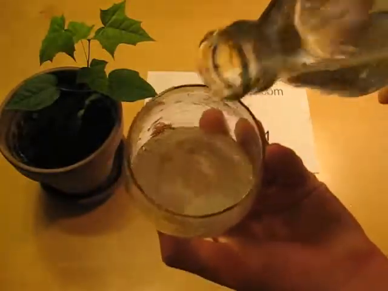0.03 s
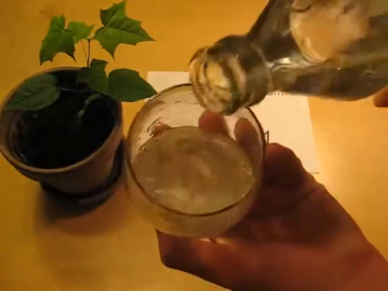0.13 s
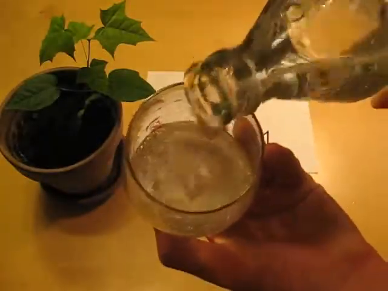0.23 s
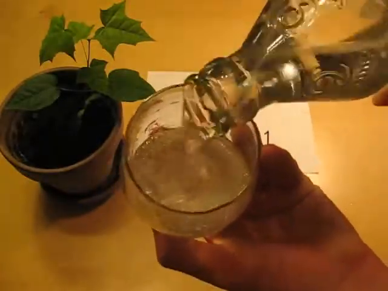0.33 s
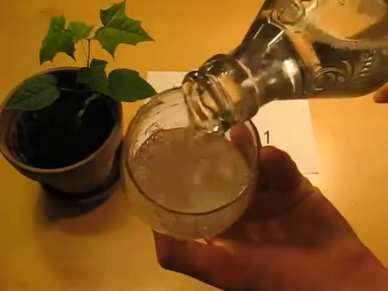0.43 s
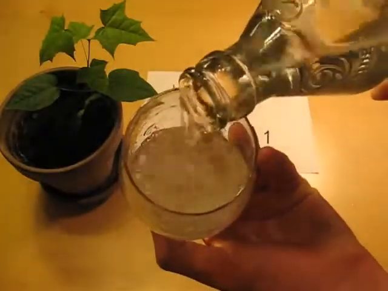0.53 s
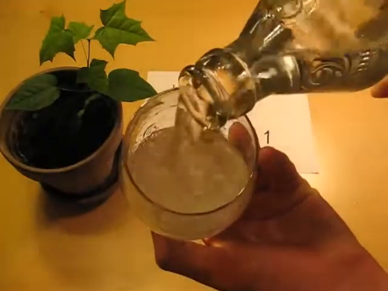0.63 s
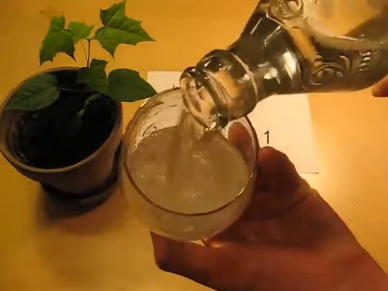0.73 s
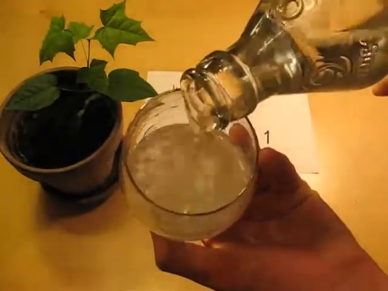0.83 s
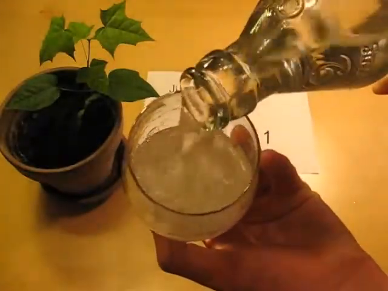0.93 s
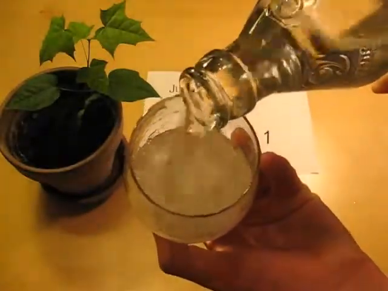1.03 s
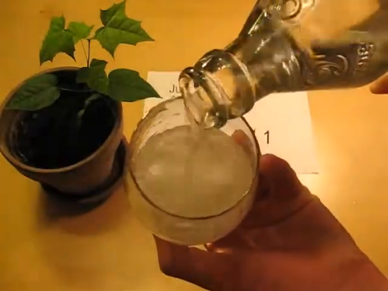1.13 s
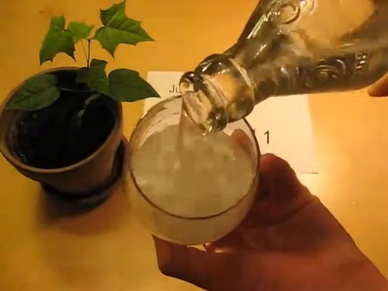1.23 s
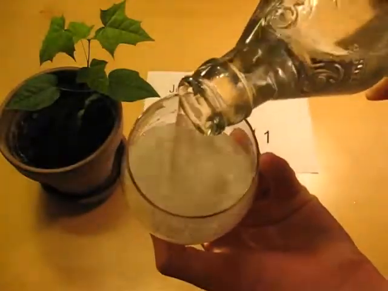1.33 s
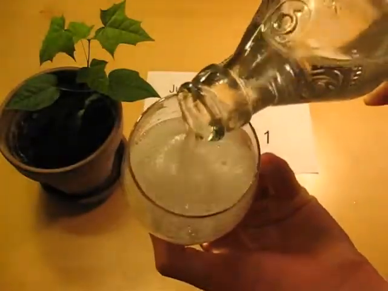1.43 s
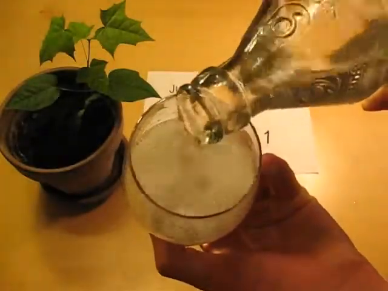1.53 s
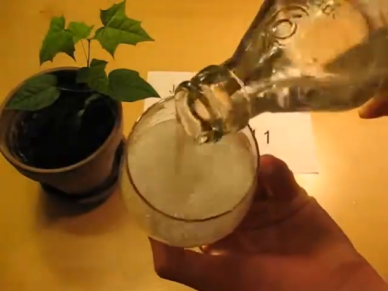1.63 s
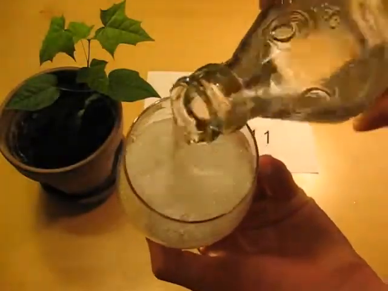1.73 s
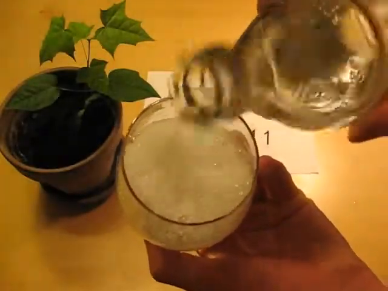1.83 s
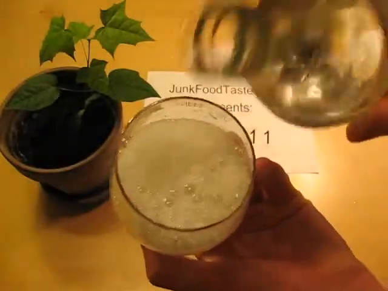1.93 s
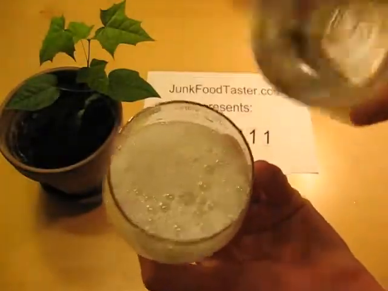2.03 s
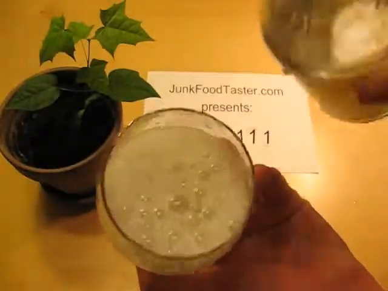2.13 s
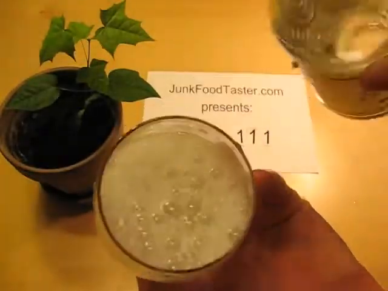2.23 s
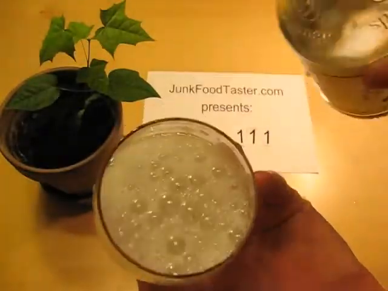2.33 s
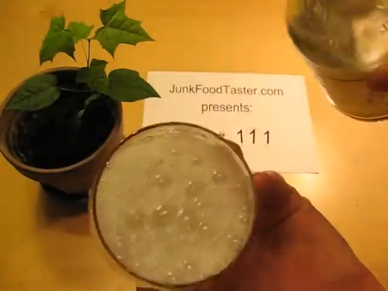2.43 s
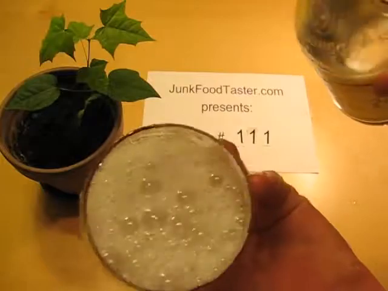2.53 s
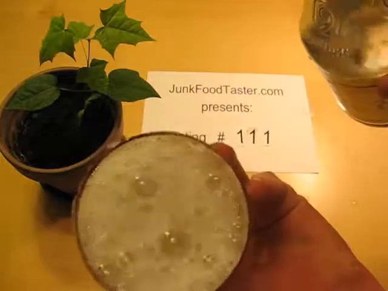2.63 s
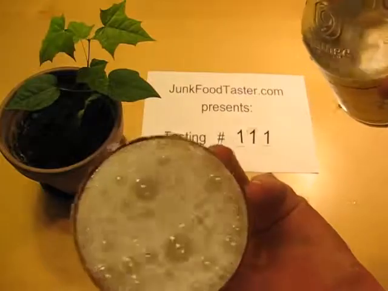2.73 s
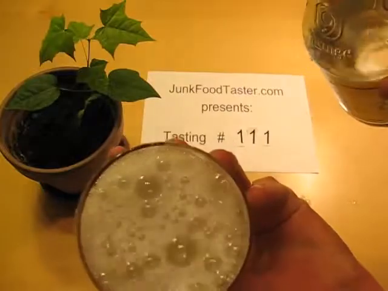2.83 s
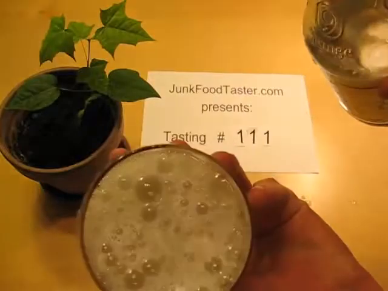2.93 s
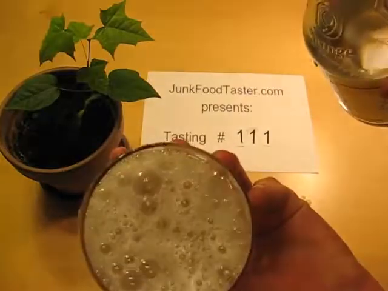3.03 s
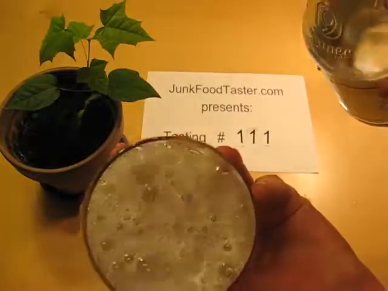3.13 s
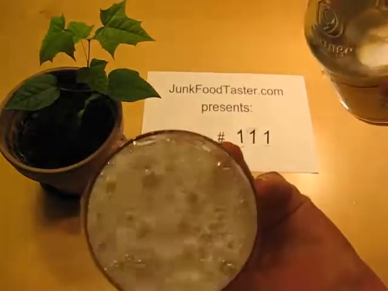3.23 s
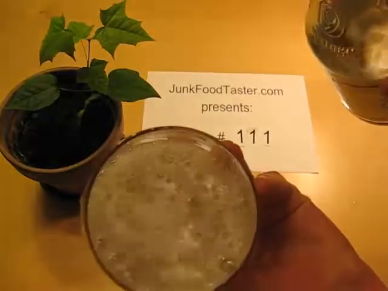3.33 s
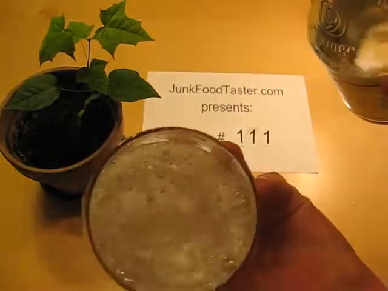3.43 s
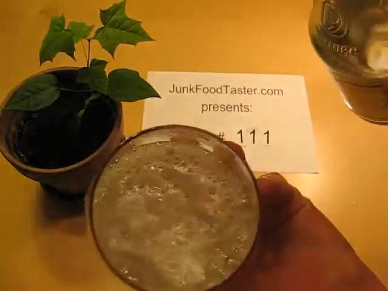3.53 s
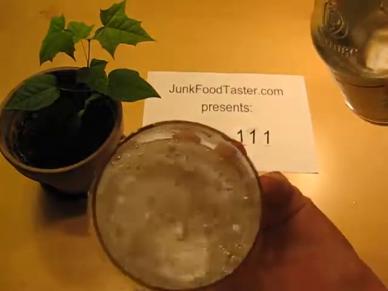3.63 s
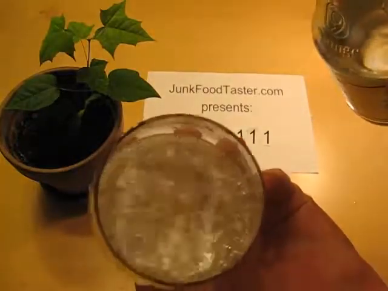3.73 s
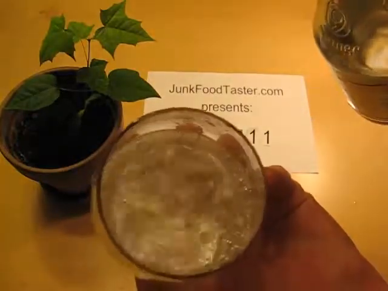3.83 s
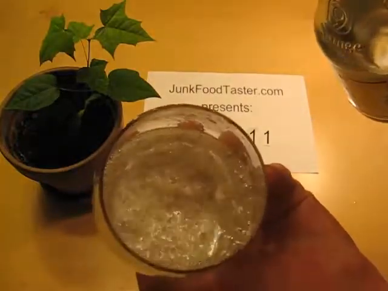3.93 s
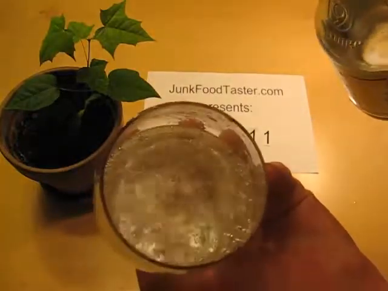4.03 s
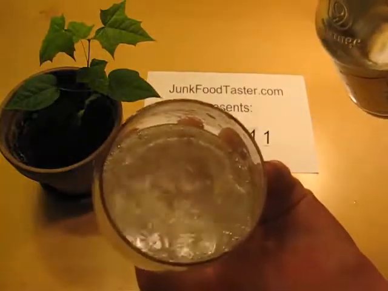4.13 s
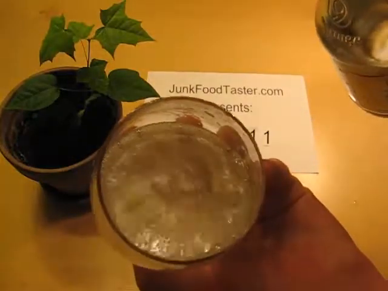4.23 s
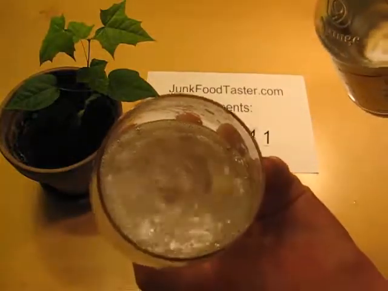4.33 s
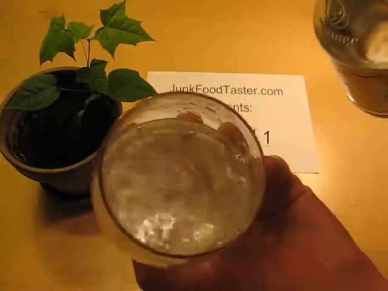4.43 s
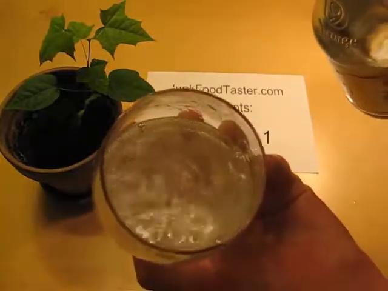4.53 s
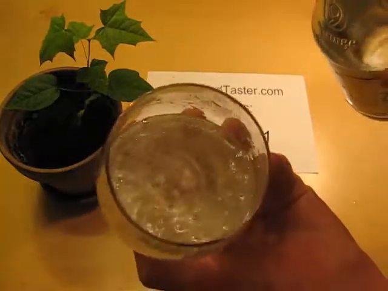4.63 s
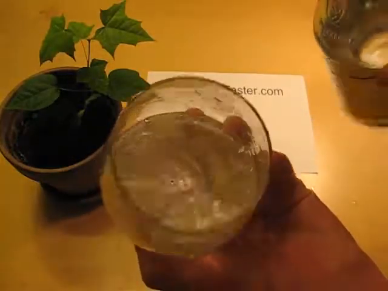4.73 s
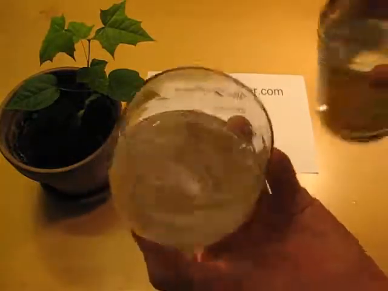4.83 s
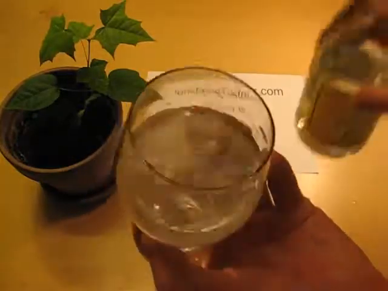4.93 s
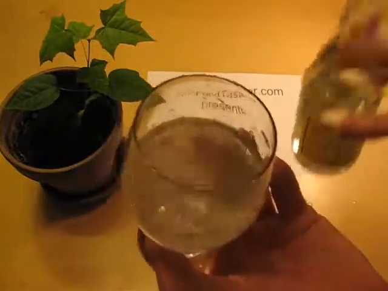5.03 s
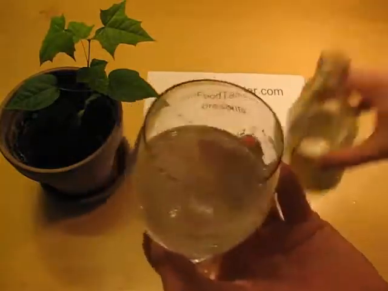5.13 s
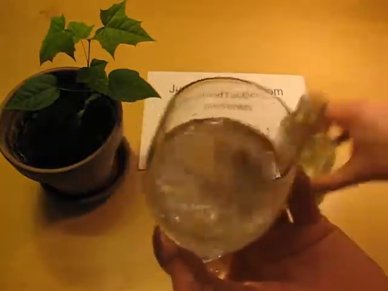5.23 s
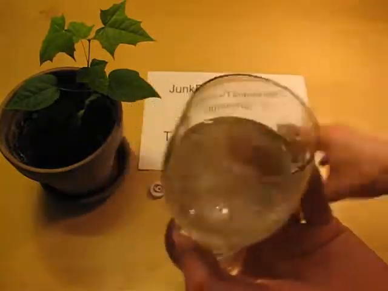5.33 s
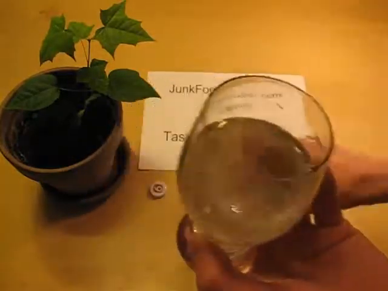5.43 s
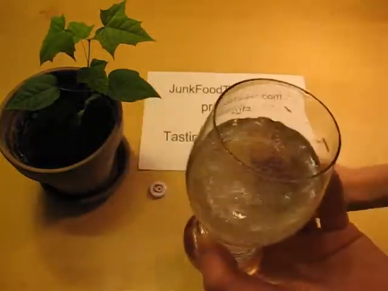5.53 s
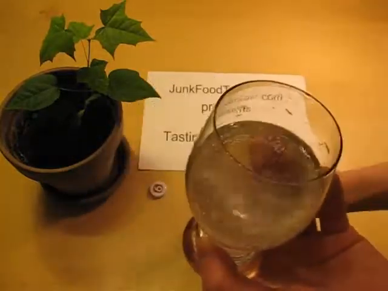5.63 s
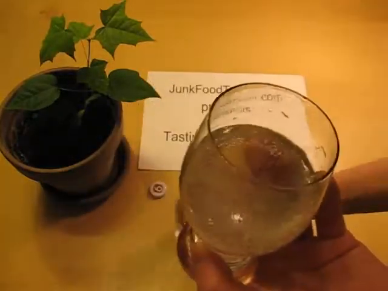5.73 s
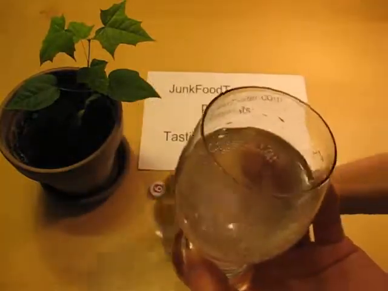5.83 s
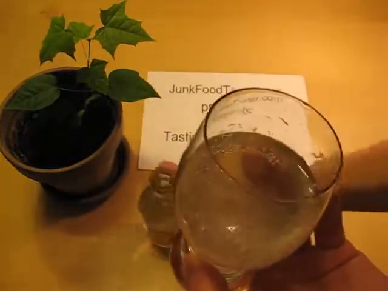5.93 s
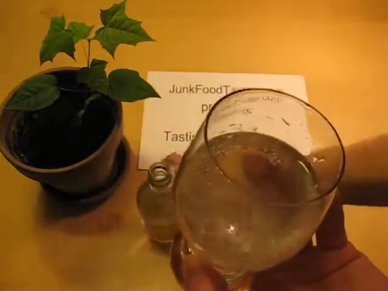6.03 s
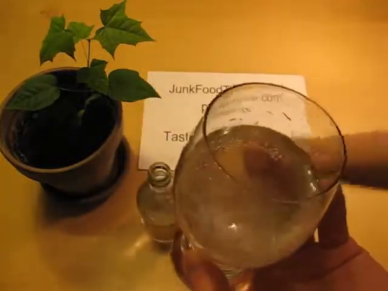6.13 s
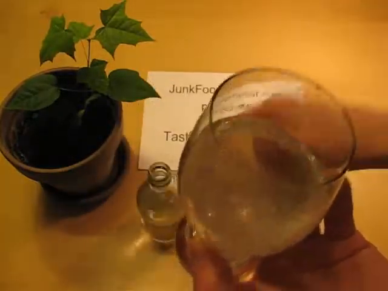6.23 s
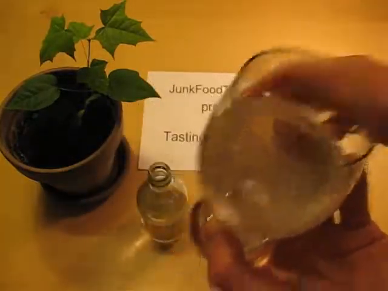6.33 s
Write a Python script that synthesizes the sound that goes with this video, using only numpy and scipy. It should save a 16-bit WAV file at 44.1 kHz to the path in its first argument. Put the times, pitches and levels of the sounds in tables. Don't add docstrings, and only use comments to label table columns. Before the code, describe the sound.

Close fizzy pour from bottle to glass: clink, snapping splashes, gulps, crackling foam fading to sparse pops, ending with a hard thud on a table.

```python
import sys
import numpy as np
from scipy import signal
from scipy.fft import rfft, irfft, next_fast_len
from scipy.io import wavfile

SR = 44100
rng = np.random.default_rng(int(sys.argv[2]) if len(sys.argv) > 2 else 0)


def materialize(psi):
    bounded = np.clip(np.atleast_2d(psi).T, -1, 1)
    quanta = np.round(bounded * 32767).astype(np.int16)
    wavfile.write(sys.argv[1], SR, quanta)


def amplitude_ratio(level_db):
    exponent = np.asarray(level_db, float) / 20
    return 10 ** exponent


N = 280917
SIZE = next_fast_len(N + 8192)
HZ, T = np.fft.rfftfreq(SIZE, 1 / SR), np.arange(N) / SR


def evened(x):
    return x / np.sqrt(np.mean(x ** 2) + 1e-20)


def follow(points, t=T):
    return np.interp(t, *np.transpose(points))


def read(points):
    f, value = np.transpose(points)
    return np.interp(np.log(HZ + 1), np.log(f + 1), value)


def colour(x, points):
    cepstrum = irfft(np.log(amplitude_ratio(np.maximum(read(points), -90))), SIZE)
    lag = np.arange(SIZE)
    fold = np.where(lag > SIZE // 2, 0, np.where(lag > 0, 2, 1))
    response = np.exp(rfft(cepstrum * fold))
    return evened(irfft(rfft(x, SIZE) * response, SIZE)[..., :N])


def tinted(x, points):
    return x.std() * colour(x, points)


def add(mix, s, sound):
    part = mix[round(s * SR):][:len(sound)]
    part += sound[:len(part)]


def resonate(x, hz, width):
    turn = np.exp(2j * np.pi * np.cumsum(hz * np.ones(N)) / SR)
    r = np.exp(-np.pi * width / SR)
    return 2 * (turn * signal.lfilter([1 - r], [1, -r], x / turn)).real


def ring(hz, db, t60, glide=0., rise=0.0011, turns=0.):
    t = np.arange(round(max(t60, .004) * SR)) / SR
    envelope = amplitude_ratio(db - 60 * t / t60) * (1 - np.exp(-t / rise))
    return envelope * np.sin(2 * np.pi * (turns + hz * t * (1 + glide * t / t60)))


def puff(db, fade):
    t = np.arange(600) / SR
    return amplitude_ratio(db) * rng.standard_normal(600) * np.exp(-t / fade)


def swell(top_hz, low_hz=1):
    rates = np.geomspace(low_hz, top_hz, 16)
    return evened(sum(np.sin(2 * np.pi * (f * T + rng.random())) / np.sqrt(f) for f in rates))


def summed(*db):
    return 10 * np.log10(sum(amplitude_ratio(d) ** 2 for d in db))


# (frequency [Hz], likeness [0-1])
NEAR_SAME = [(60, 1), (130, 1), (290, 0.91), (640, 0.92), (1410, 1), (3100, 0.92), (6820, 0.74),
             (15000, 0.01)]
# (frequency [Hz], left over right [dB])
NEAR_BALANCE = [(60, -1), (110, -1), (200, 0.5), (380, -2), (700, 0), (1290, 0.5), (2380, -2.5),
                (4400, -5.5), (8120, -2.5), (15000, 16)]
# (frequency [Hz], left lead [rad])
NEAR_LEAD = [(0, 0.13), (3700, 0.023), (4700, 0.64), (9000, 0.73), (16000, 3.3)]


def ports(pair, same, louder=NEAR_BALANCE, lead=NEAR_LEAD):
    a, b = rfft(pair, SIZE)
    likeness = np.clip(read(same), 0, 1)
    side = amplitude_ratio(read(louder) / 2) * np.exp(.5j * read(lead))
    shared, own = np.sqrt((1 + likeness) / 2) * a, np.sqrt((1 - likeness) / 2) * b
    return irfft(np.array([(shared + own) * side, (shared - own) / side]), SIZE)[:, :N]


# (frequency [Hz], t60 [s])
ROOM_DECAY = [(120, 1), (320, 0.6), (840, 0.57), (2200, 0.67), (4500, 0.69), (7000, 0.38), (12000, 0.093)]


def tail(t60_scale, start):
    taps = np.zeros((2, SR))
    at = np.arange(start, SR - 20, 20)
    at = at + rng.integers(0, 20, (2, len(at)))
    np.put_along_axis(taps, at, rng.choice([-1., 1.], at.shape), 1)
    hz, t, z = signal.stft(taps, SR, nperseg=256)
    t60 = t60_scale * follow(ROOM_DECAY, hz)
    taps = signal.istft(z * amplitude_ratio(-60 * t / t60[:, None]), SR, nperseg=256)[1]
    return taps / np.linalg.norm(taps[0])


# (frequency [Hz], level [dB per Hz])
HUSH_TONE = [(15, -51), (25, -15), (400, -5.5), (973, -9), (1210, -9.5), (1540, -14.5), (2570, -19.5),
             (3020, -6), (3450, -18), (4100, -9), (6300, -12.5), (7530, -2), (9090, -10.5), (12200, -13.5),
             (15600, -53)]
# (frequency [Hz], likeness [0-1])
HUSH_SAME = [(60, 0), (130, 0.54), (290, 0.5), (640, 0.76), (1410, 0), (3100, 0), (6820, 0.55),
             (15000, 0.9)]


def hush():
    noise = colour(rng.standard_normal((2, N)), HUSH_TONE)
    return ports(amplitude_ratio(-49 + 1.2 * swell(8.4)) * noise, HUSH_SAME)


def bubbles(per_s, spread_db, cycles, count=14, largest=6):
    size = amplitude_ratio(spread_db * np.minimum(rng.exponential(1, (2, N)), largest))
    size = size * (rng.random((2, N)) < per_s / SR)
    kind, z, power = rng.integers(0, count, (2, N)), 0, 1e-9
    for k, hz in enumerate(np.geomspace(600, 16000, count)):
        burst = ring(hz, 0, cycles / hz, glide=0.38, rise=0.34 / hz)
        grain = rfft(evened(burst) * np.sqrt(hz), SIZE)
        z = z + grain * rfft(size * (kind == k), SIZE)
        power = power + abs(grain) ** 2
    return evened(irfft(z / np.sqrt(power), SIZE)[:, :N])


# (time [s], level [dB])
BURSTING = [(0.0, -56.5), (0.17, -45.5), (0.35, -77), (0.6, -67), (0.89, -49), (1.17, -41.5), (1.33, -39.5),
            (1.89, -38), (2.3, -37), (3.05, -37), (3.26, -36.5), (3.56, -36), (4.15, -45), (4.65, -47.5),
            (5.13, -59.5), (5.5, -86)]
# (time [s], depth [0-1])
HEAD = [
    (1.15, 0.32),
    (1.35, 0.85),
    (2.2, 0.97),
    (2.75, 0.93),
    (3.2, 0.61),
    (3.6, 0),
]
# (time [s], level [dB])
SLOSH = [
    (.3, -60),
    (.5, -63),
    (4.8, -58),
    (5.15, -61.5),
    (5.45, -57.5),
    (5.74, -52.5),
    (5.95, -46),
    (6.15, -53),
]


def controls():
    foam_db, head = follow(BURSTING), np.clip(follow(HEAD), 0, 1)
    filled = np.clip((T - 0.27) / (1.9 - 0.27), 0, 1)
    deep_bare_db, deep_full_db = -22, -4
    cross_bare_db, cross_full_db, cross_rest_db = -9.5, -27, -16
    deep_db = summed(foam_db + deep_bare_db + (deep_full_db - deep_bare_db) * head, follow(SLOSH))
    thin_db = -43 - 3 * np.sin(np.pi * filled) ** .5
    thin_db = thin_db - 3.5 * np.maximum(T - 3.5, 0)
    cross_db = foam_db + cross_bare_db + (cross_full_db - cross_bare_db) * head
    cross_db = summed(cross_db, thin_db + cross_rest_db)
    empty_hz, full_hz = 990, 1221
    return foam_db, deep_db, thin_db, cross_db, empty_hz + (full_hz - empty_hz) * filled


# (frequency [Hz], level [dB per Hz])
FOAM_TONE = [(880, -72), (1500, -24), (2240, -17), (2810, -3), (3250, -6.5), (4320, -0.5), (5570, -2),
             (7190, 1), (9640, -11.5), (12000, -15), (14300, -22.5), (15600, -44)]
DEEP_TONE = [(260, -100), (450, -6), (553, -15.5), (640, -3), (917, -3.5), (1140, 4), (1990, -1),
             (3500, -18), (4550, -17), (7700, -120)]
THIN_TONE = [(880, -76), (1500, -21), (2600, -22), (2920, -23), (3450, 5.5), (4360, -6), (6150, 7),
             (7260, 9), (9930, -2), (15600, -15)]
# (frequency [Hz], width [Hz], level [dB])
AIR_MODES = [(2924, 164, -4.5), (4500, 71, -7), (5630, 200, -4), (7500, 340, 3.5), (8060, 320, 0),
             (11540, 1900, -1)]
# (time [s], stretch [ratio])
TILT = [
    (3.2, .985),
    (3.9, 1.0),
    (4.75, 1.0),
    (5.15, 1.025),
]
# (time [s], pitch stretch [ratio], ring share [ratio])
CUP_LOAD = [
    (1.7, 1.1, 0.59),
    (2.0, 1.03, 0.74),
    (2.3, 1.18, 0.22),
    (2.58, 0.97, 1.08),
    (3.1, 1, 1),
    (3.6, 1.03, 1.7),
    (4.4, 1.01, 0.65),
    (5.599, 1.01, 0.94),
    (6.0, 1.1, 0.2),
]
# (time [s], frequency [Hz], share [ratio])
COLLAPSE = [
    (2.7, 4300, -0.013),
    (2.97, 4400, .5),
    (3.25, 6340, 0.35),
    (3.5, 5230, -0.25),
    (3.9, 5300, 0.46),
]
# (time [s], level [dB])
STREAM = [
    (.4, -66),
    (.44, -64),
    (.8, -48.5),
    (1.1, -46.5),
    (1.7, -50),
    (1.95, -83),
]
# (frequency [Hz], level [dB per Hz])
DROPLET_TONE = [(900, -8), (1800, -23), (3200, -2.5), (4500, 0), (7500, -5), (12000, -35)]


def fizz():
    foam_db, deep_db, thin_db, cross_db, air_hz = controls()
    s, sag, share = np.transpose(CUP_LOAD)
    air_hz, rings = air_hz * np.interp(T, s, sag), np.interp(T, s, share)
    dense, sparse = bubbles(9000, 0.78, 8.2), bubbles(5000, 0.9, 16.7)

    foam = amplitude_ratio(foam_db + 2.0 + .5 * swell(21)) * colour(dense, FOAM_TONE)
    s, hz, share = np.transpose(COLLAPSE)
    foam = foam + np.interp(T, s, share) * resonate(foam, np.interp(T, s, hz), 1200)

    deep = colour(dense, DEEP_TONE)
    cup_colour = 1.15 * resonate(deep, air_hz, 125) - .5 * resonate(deep, 720, 410)
    deep = amplitude_ratio(deep_db - 1.0 + 0.067 * swell(19)) * (deep + rings * cup_colour)

    stretch = np.where(T < 2.55, 1, follow(TILT))
    modes = []
    for hz, width, db in AIR_MODES:
        once = resonate(sparse, hz * stretch, 1.07 * width)
        modes.append(amplitude_ratio(db) * evened(resonate(once, hz * stretch, 1.07 * width)))
    cross, *upper = modes
    cup = amplitude_ratio(-25.0) * rings * evened(resonate(sparse, air_hz, 48))
    thin = evened(sum(upper)) + cup + amplitude_ratio(4.5) * colour(sparse, THIN_TONE)
    thin = amplitude_ratio(thin_db - 3.5 + 0.11 * swell(30)) * thin
    drops = amplitude_ratio(follow(STREAM)) * colour(bubbles(900, 4.5, 11.0, count=9, largest=2.2), DROPLET_TONE)

    bare = np.clip((-50.0 - deep_db) / 9, 0, 1)
    hiss = (1 - 0.019 * bare) * foam + 0.3 * bare * amplitude_ratio(foam_db) * evened(sum(upper[:2])) + thin
    hiss = hiss - 1.0 * bare * resonate(hiss, 3300, 380)
    high_valleys = resonate(hiss, 6280, 520) + resonate(hiss, 5230, 340)
    hiss = hiss - 0.75 * bare * resonate(hiss, 3610, 750) - 0.5 * bare * high_valleys
    bowl = amplitude_ratio(cross_db + 5.5) * (0.44 + 0.33 * bare) * (cross + amplitude_ratio(9.0) * bare * cup)
    return hiss + deep + bowl + drops


def gulp(db, start_hz, end_hz, length, lean):
    u = np.arange(round(length * SR)) / (length * SR)
    turns = np.cumsum(start_hz * (end_hz / start_hz) ** u) / SR
    return amplitude_ratio(db) * np.sin(np.pi * u ** lean) ** 2 * np.sin(2 * np.pi * turns)


# (time [s], peak level [dB], length [s])
GULPS = [
    (0.499, -41, 0.067),
    (0.85, -45.5, 0.052),
    (1.147, -44.5, 0.061),
    (1.467, -41.5, 0.043),
]
# (time [s], peak level [dB], frequency [Hz], length [s])
GLUGS = [
    (.97, -51.5, 142, 0.052),
    (1.017, -42.5, 315, 0.043),
    (1.259, -45, 203.5, 0.067),
    (1.312, -36.5, 311, 0.041),
    (1.368, -49, 273, 0.11),
    (1.554, -38.5, 240, 0.055),
    (1.633, -39, 296, 0.033),
    (1.696, -38, 290, 0.014),
]
# (time [s], frequency [Hz], level [dB])
NECK = [
    (0.0, 251, -55),
    (.5, 252, -58.5),
    (1.25, 254, -62.5),
    (1.7, 262, -66.5),
    (2.47, 262, -67),
    (2.56, 262, -78),
    (2.88, 262, -76),
    (2.98, 262, -68),
    (3.75, 262, -69),
    (3.9, 262, -87),
]
# (time [s], level [dB])
HANDLING = [
    (4.4, -73),
    (4.7, -57),
    (4.9, -65),
    (5.2, -69),
    (5.5, -62.5),
    (5.75, -56),
    (5.85, -90),
]


def bottle():
    out = np.zeros(N)
    for s, db, length in GULPS:
        add(out, s, gulp(db, 25.8, 243, length, lean=2.0))
    for s, db, hz, length in GLUGS:
        add(out, s, gulp(db, hz, 0.964 * hz, length, lean=0.56))
    s, hz, db = np.transpose(NECK)
    hz = np.interp(T, s, hz)
    tone = 0.64 * np.sin(2 * np.pi * np.cumsum(hz) / SR)
    hum = evened(resonate(rng.standard_normal(N) + tone, hz, 24.0))
    rub = evened(resonate(rng.standard_normal(N), 310, 210))
    out += amplitude_ratio(follow(HANDLING) + 2.0 * swell(19)) * rub
    return out + amplitude_ratio(np.interp(T, s, db) - 15 * np.maximum(T - s[-1], 0)) * hum


# (frequency [Hz], level [dB per Hz])
SPRAY_TONE = [(880, -68), (1500, -18.5), (2920, -16.5), (5250, -4.5), (7400, -6), (10000, -14.5),
              (12500, -16.5), (15600, -39)]
RIM_HZ = [630, 624, 760, 1001, 1250, 1403, 2630, 3030, 4836, 6300, 7530, 7765, 9600]
# (level [dB], t60 [s], lean to the left [-1 to 1])
RIM = [(2.5, 0.036, -0.11), (-26, 0.18, -.3), (1.5, 0.018, 0.19), (2.5, 0.025, .1), (0, 0.026, .1),
       (-18.5, 0.51, -.2), (-21, 0.3, -.2), (4.5, .014, -0.23), (-8, 0.62, 0.96), (-2, .024, .1),
       (-19, 0.49, -0.1), (-18, .11, .1), (-30, 0.12, .1)]
TWIN_HZ = [1392, 4845, 7552]
# (level [dB], t60 [s], start [turns])
TWINS = [(-14.5, 0.17, 0.067), (-7, .34, 0.41), (-13.5, 0.21, 0.81)]


def clink():
    hit_s, hit_db = .3058, -16
    out, tick, facing = np.zeros((3, N))
    for hz, (db, t60, lean) in zip(RIM_HZ, RIM):
        add(out, hit_s, -ring(hz, hit_db + db + 3.5, t60, rise=0.0009))
        add(facing, hit_s, -lean * ring(hz, hit_db + db + 3.0, t60, rise=.0005))
    for hz, (db, t60, start) in zip(TWIN_HZ, TWINS):
        add(out, hit_s, -ring(hz, hit_db + db + 6.5, t60, turns=start))
    add(tick, hit_s, puff(hit_db + 1.5, 0.0031))
    tick = tinted(tick, SPRAY_TONE)
    thin_glass = signal.butter(2, 380, "highpass", fs=SR)
    return signal.lfilter(*thin_glass, [out + tick, 0.73 * tick + facing])


# (time [s], peak level [dB], ring [Hz], low thump [dB relative])
PLOPS = [(0.432, -28, 990, -31), (0.471, -19, 990, -11), (0.532, -35, 806, -14), (0.548, -40, 960, 1),
         (0.574, -36, 925, -19), (0.584, -33, 810, -8), (0.61, -41, 980, -14), (0.658, -25, 811, -17),
         (0.6596, -26.5, 1080, -24), (0.692, -39.5, 820, -9), (0.708, -37.5, 1010, -16),
         (0.739, -37, 940, -13), (0.79, -38.5, 1230, -6), (0.84, -45, 700, -14), (0.916, -40, 1130, -2),
         (0.964, -44, 1100, -14), (1.05, -42, 1110, -20), (1.094, -37, 1270, -10),
         (1.439, -28.5, 1230, -13), (1.554, -38, 1180, -9), (1.583, -45, 1150, -15),
         (1.774, -49, 1250, -13), (1.816, -42, 1180, -15), (1.847, -38, 1310, -15), (1.959, -49, 1110, -15),
         (0.874, -27.5, 1114, -5.5), (1.0209, -15, 1122, -10), (1.069, -30, 1064, -28),
         (1.083, -34, 1100, -23), (1.186, -30, 1090, -9), (1.268, -30, 1254, -23), (1.316, -15.5, 1062, 0),
         (1.35, -23, 1090, -13), (1.374, -34, 1190, 6.5), (1.482, -30.5, 1260, -25),
         (1.504, -25.5, 1230, -20), (1.524, -33, 1200, -26), (1.638, -21, 1280, 0.5),
         (1.699, -19, 1195, -8), (1.907, -32.5, 1130, -9)]
# (time [s], peak level [dB], frequency [Hz])
SNAPS = [(0.4323, -8.5, 5060), (0.444, -10.5, 5200), (0.489, -15, 7150), (0.5094, -23, 6900),
         (0.525, -24, 7500), (0.531, -24, 7460), (0.5471, -10.5, 7370), (0.5646, -13, 7400),
         (0.574, -13, 7780), (0.5814, -29, 7640), (0.609, -24.5, 5700), (0.6088, -23, 7400),
         (0.6483, -21, 6530), (0.648, -22, 5630), (0.6576, -34, 7500), (0.6645, -25, 7260),
         (0.688, -31, 7050), (0.7097, -28, 7450), (0.728, -19.5, 5000), (0.8727, -13.5, 7500),
         (0.899, -36, 6800), (0.931, -26.5, 7650), (1.0213, -6, 7120), (1.0323, -16, 7240),
         (1.071, -11.5, 6140), (1.1676, -17, 8300), (1.1852, -15, 7020), (1.268, -19, 6160),
         (1.3171, -15.5, 7370), (1.483, -20, 7370), (1.6384, -13, 6100)]
# (time [s], peak level [dB], frequency [Hz], t60 [s])
BLIPS = [(0.4322, -21, 3470, 0.019), (0.4924, -29.5, 3130, .025), (0.5304, -29, 2340, 0.028),
         (0.5446, -29, 2900, 0.046), (0.574, -23, 2900, 0.037), (0.5823, -16, 2830, 0.013),
         (0.645, -28, 5630, 0.034), (0.687, -23.5, 3310, 0.022), (0.7093, -26.5, 3520, 0.023),
         (0.841, -29, 4500, .022), (0.8633, -31, 3090, 0.031), (0.899, -12.5, 6920, 0.027),
         (0.965, -22, 2950, 0.0092), (1.0195, -26.5, 3020, 0.024), (1.083, -15.5, 3153, 0.024),
         (1.267, -32, 3470, .022), (1.313, -19, 3470, 0.012), (1.3357, -23.5, 2840, 0.016),
         (1.483, -30, 4150, 0.024), (1.638, -14, 4170, 0.0094), (1.6998, -28, 3140, .022),
         (0.361, -21, 3770, 0.015), (0.424, -33, 4100, 0.01), (0.5006, -32, 1800, .012),
         (0.574, -29, 4100, 0.011), (0.585, -31, 3700, 0.0086), (0.611, -36, 3000, .02),
         (0.7575, -27, 3500, .01), (0.483, -35, 2050, 0.017), (0.5475, -20.5, 3500, 0.022),
         (0.585, -23.5, 2220, 0.013), (0.688, -28, 3920, 0.027), (0.7506, -38, 2850, 0.049),
         (0.7895, -29.5, 2210, 0.016), (0.7895, -28, 3500, .012), (0.9307, -28, 3900, .008),
         (0.9504, -31, 3810, 0.014), (0.9646, -26, 2130, 0.0086), (0.981, -31, 2800, .025),
         (0.994, -33, 2970, 0.017), (1.0055, -20, 4300, .008), (1.0704, -28, 3100, .012),
         (1.1682, -39, 4450, .015), (1.185, -33, 4520, 0.014), (1.2575, -23, 4100, 0.016),
         (1.386, -29, 2900, .015), (1.907, -16, 2400, 0.0039)]
# (time [s], peak level [dB], frequency [Hz], t60 [s])
MORE_BLIPS = [(.4323, -24, 5100, .02), (.4326, -17, 6860, .02), (0.4447, -15, 5280, .022),
              (.4446, -18, 7000, .02), (0.489, -15, 7730, 0.014), (0.547, -31, 5580, 0.054),
              (.5477, -30, 1950, .015), (0.433, -31, 1840, .015)]
# (time [s], peak level [dB], frequency [Hz])
POPS = [(4.1394, -33, 5600), (4.26, -33, 5530), (4.395, -38, 1200), (4.5527, -31, 5630), (4.596, -33, 5700),
        (4.642, -32, 4260), (4.684, -32, 7200), (4.835, -33, 7200), (4.9794, -44, 3540), (5.033, -38, 7700),
        (5.0794, -42, 5560), (5.1497, -42, 7680), (5.1741, -36, 7300), (5.233, -43, 3450),
        (5.2795, -34, 7560), (5.3357, -39, 7800), (5.423, -32, 7900), (5.551, -40, 4330),
        (5.721, -38, 7540), (4.23, -42, 7600), (4.3144, -37, 7400), (4.4446, -41, 7600),
        (4.6297, -39, 7600), (4.952, -41, 5800), (4.989, -41, 5900), (5.044, -37, 7400), (5.068, -41, 7900),
        (5.1276, -47, 7800), (5.312, -36, 8250), (5.3835, -37, 7750), (5.5636, -39, 7600)]
# (time [s], peak level [dB])
TICKS = [(0.431, -25), (0.4698, -30), (0.4933, -31), (0.5312, -22), (0.5467, -27), (0.576, -21),
         (0.5844, -21), (0.6078, -32), (0.6569, -33), (0.6873, -21), (0.713, -30), (0.7502, -28),
         (0.7896, -30), (0.841, -37), (0.8714, -33), (0.8944, -38), (0.9308, -34), (0.9654, -26),
         (1.0202, -20), (1.0705, -22), (1.0825, -18), (1.269, -17), (1.3135, -16), (1.3359, -31),
         (1.6382, -18)]
# (frequency [Hz], level [dB per Hz])
SLUG_TONE = [(150, -45), (250, -44), (584, 0.5), (834, 5.5), (1130, 4.5), (2100, -19), (2500, -46),
             (3250, -59), (5500, -120)]
TICK_TONE = [(500, -24), (1700, -1.5), (3500, -3), (6500, -4), (14000, -17)]


def splash():
    out, slugs, spray, ticks = np.zeros((4, N))
    for s, db in TICKS:
        add(ticks, s + .0004, amplitude_ratio([db + 4.5]))
    for s, db, hz, low_db in PLOPS:
        t60 = 0.099 * (1 - 0.62 * follow(HEAD, s))
        add(out, s, ring(hz, db + 0.5, 0.3 * t60, glide=0.045, rise=0.00053))
        add(out, s, ring(hz, db - 7.5, 1.03 * t60, glide=0.026))
        add(out, s, ring(min(0.583 * hz, 690), db + low_db, .5 * t60))
        add(slugs, s, puff(db - 4.0, 0.0018))
    snap_t60 = 0.015
    for s, db, hz in SNAPS:
        add(out, s, ring(hz, db - 9.0, snap_t60, glide=0.082, rise=0.002))
        add(out, s, ring(hz, db + 0.5, 0.0046, rise=0.00058))
        add(out, s + 0.00055, ring(1.3 * hz, db - 18, 0.71 * snap_t60, glide=-.04))
        add(spray, s, puff(db - 11.5, 0.0026))
    for s, db, hz, t60 in BLIPS:
        add(out, s, ring(hz, db, t60, glide=0.023))
        add(spray, s, puff(db - 16.0, 0.0031))
    for s, db, hz, t60 in MORE_BLIPS:
        add(out, s, ring(hz, db, t60))
    for s, db, hz in POPS:
        add(out, s, ring(.97 * hz, db + 4.0, 0.0088, glide=0.07, rise=0.0003))
        add(ticks, s, amplitude_ratio([db - 2.0]))
        add(spray, s, puff(db - 7.0, 0.0011))
    out += tinted(slugs, SLUG_TONE) + tinted(spray, SPRAY_TONE) + tinted(ticks, TICK_TONE)
    return out + sum(amplitude_ratio(db + 3.0) * resonate(out, hz, 0.52 * w) for hz, w, db in AIR_MODES[:4])


# (frequency [Hz], level [dB], t60 [s])
BOARD = [(349, -7.5, 0.12), (332.4, -13, 0.52), (540, -26, 0.09), (714, -4.5, 0.025), (1450, -19, 0.044)]
FRAME_HZ = [122, 930, 189, 263, 301, 356, 390, 424, 455, 499, 565, 623, 707, 763]
# (level [dB], t60 [s], rise [s])
FRAME = [(3.5, 1.35, 0.94), (7.5, 0.39, 0.004), (0, 0.8, 0.011), (6.5, 0.7, 0.04), (-1.5, 1.57, 0.035),
         (-6.5, 2.07, .03), (-7.5, 1.4, .03), (-5, 0.31, .02), (-9, 0.19, 0.07), (7, 0.61, 0.033),
         (-1, 0.37, .02), (-8, 0.3, .02), (5.5, 0.51, 0.0068), (-6, .35, .02)]
# (frequency [Hz], level [dB per Hz])
WOOD_TONE = [(41, -38), (70, -39), (180, -5.5), (229, -13), (436, 3), (590, -5), (700, -5.5), (797, -6),
             (2660, -21), (7640, -38.5), (12000, -57), (15600, -93), (22000, -120)]
# (frequency [Hz], likeness [0-1])
WOOD_SAME = [(60, 1), (180, 0.98), (550, 0.92), (1650, 0.61), (4970, 0.034), (15000, 0.11)]
# (frequency [Hz], left over right [dB])
WOOD_BALANCE = [(30, -13), (70, -4), (140, 1), (300, -1.8), (600, 0.5), (950, 0.5), (3770, -2.5),
                (15000, -8)]


def knock():
    hit_s, hit_db = 5.7824, 4
    blow = np.zeros(N)
    for hz, db, t60 in BOARD:
        add(blow, hit_s, ring(hz, hit_db + db, t60, rise=0.00018, turns=0.13))
    rested_s = np.maximum(T - hit_s - 0.013, 0)
    blow *= amplitude_ratio(-7 * (1 - np.exp(-(rested_s / .005) ** 2)))
    for hz, (db, t60, rise) in zip(FRAME_HZ, FRAME):
        tone = ring(hz, db - 27, t60, rise=rise)
        waver = amplitude_ratio(2.2 * swell(40, low_hz=7))
        add(blow, hit_s, tone * waver[:len(tone)])
    wet = np.roll(colour(tail(1.0, 20), WOOD_TONE), round(hit_s * SR), axis=1) * (T > hit_s)
    wet = wet * amplitude_ratio(1.67 * swell(70, low_hz=15))
    crack_band = signal.butter(2, [450, 4200], "bandpass", fs=SR)
    add(blow, hit_s, signal.lfilter(*crack_band, puff(hit_db - 8.5, 0.0086)))
    blow = signal.lfilter(*signal.butter(2, 65, "highpass", fs=SR), blow)
    no_lead = [(0, 0), (SR, 0)]
    return ports(amplitude_ratio(-33.5) * wet + [blow, 0.26 * blow], WOOD_SAME, WOOD_BALANCE, no_lead)


# (frequency [Hz], likeness [0-1])
CLINK_SAME = [(60, 0.43), (950, 0.88), (15000, 0.2)]
# (frequency [Hz], left over right [dB])
CLINK_BALANCE = [(180, -3), (550, 0), (1400, -1), (4900, 3.5), (7500, -15.5), (15000, 17)]
# (frequency [Hz], left lead [rad])
CLINK_LEAD = [(0, 1.7), (4800, -0.84), (15000, 1.4)]


def scene():
    hits, bell = splash() + bottle(), clink()
    scatter = puff(0, 0.0026)
    aside = signal.oaconvolve(hits, scatter / np.linalg.norm(scatter))[:N]
    wet = signal.fftconvolve((hits + bell[0])[None], tail(0.68, 300), axes=1)[:, :N]
    near = ports(fizz() + [hits, 0.68 * aside] + amplitude_ratio(-15.5) * wet, NEAR_SAME)
    near = near + ports(bell, CLINK_SAME, CLINK_BALANCE, CLINK_LEAD)
    return near + knock() + hush()


def top_cut(x):
    return signal.sosfilt(signal.butter(12, 15730, fs=SR, output="sos"), x)


def record(dry):
    bass_cut = signal.butter(2, 26, "highpass", fs=SR, output="sos")
    thinned = signal.sosfilt(bass_cut, dry)
    return top_cut(np.clip(thinned, -1, 1))


dry = scene()
out = record(dry)
materialize(out)
```